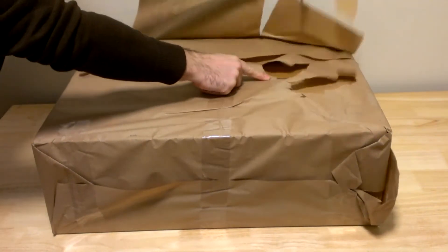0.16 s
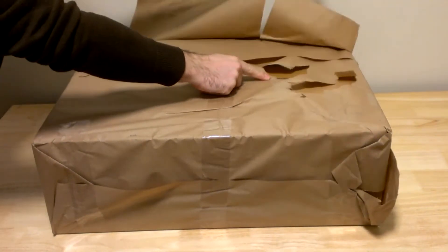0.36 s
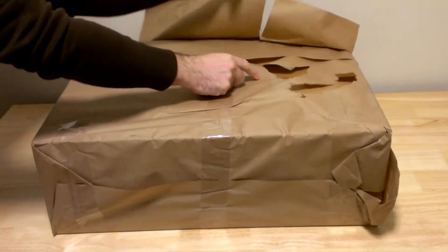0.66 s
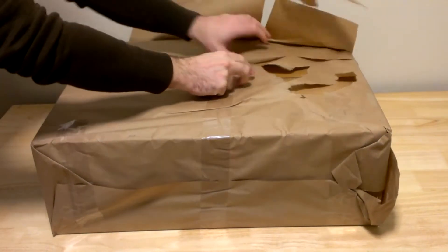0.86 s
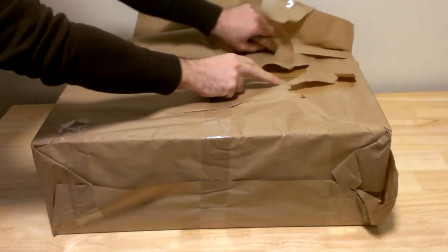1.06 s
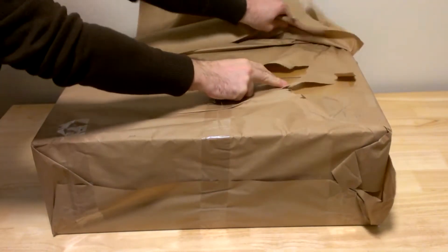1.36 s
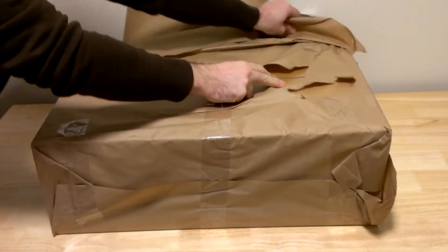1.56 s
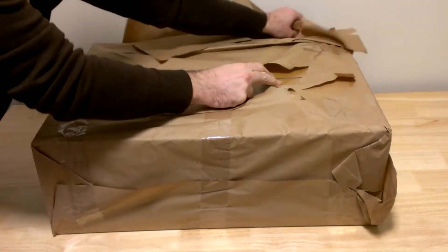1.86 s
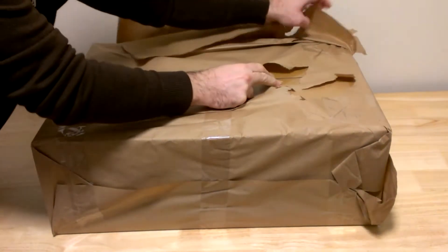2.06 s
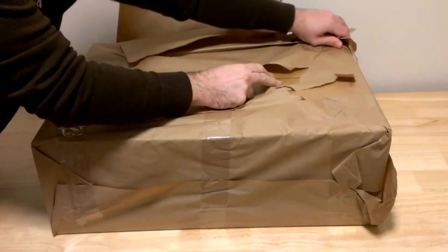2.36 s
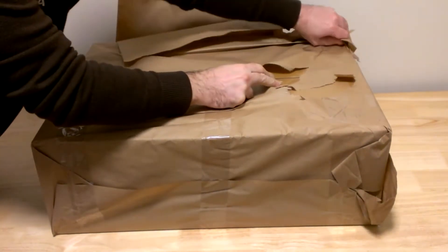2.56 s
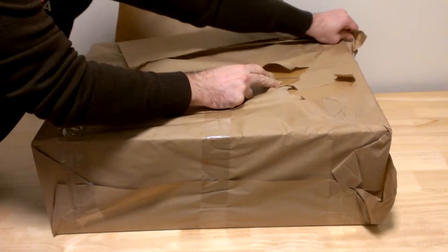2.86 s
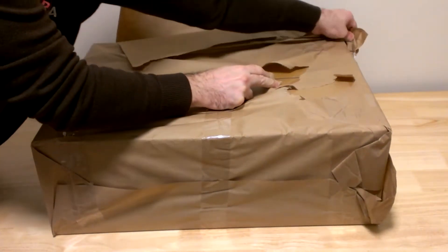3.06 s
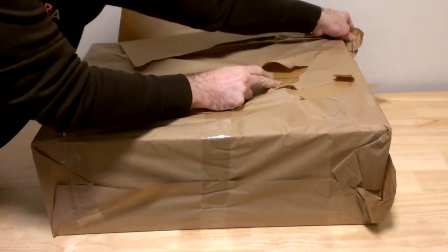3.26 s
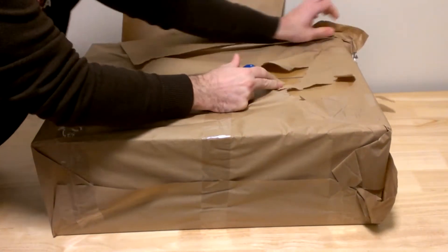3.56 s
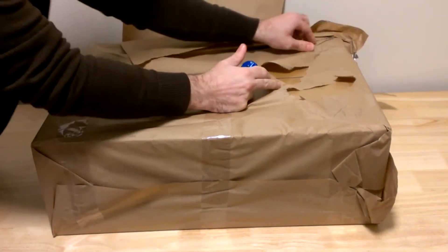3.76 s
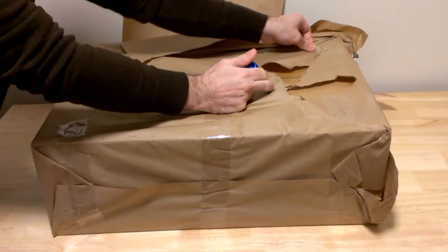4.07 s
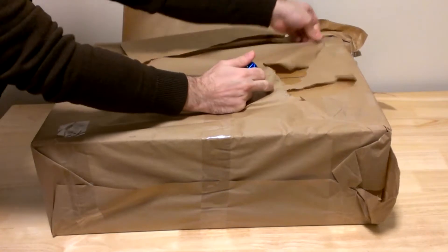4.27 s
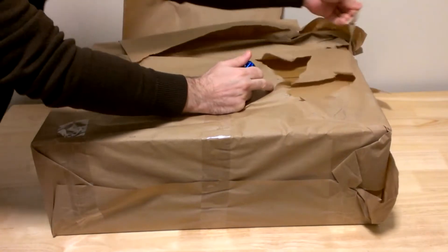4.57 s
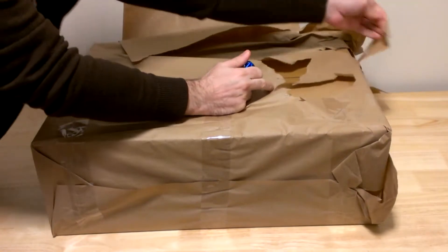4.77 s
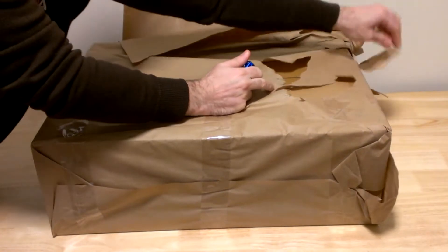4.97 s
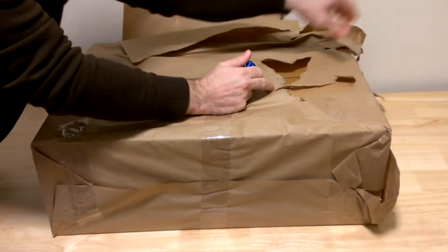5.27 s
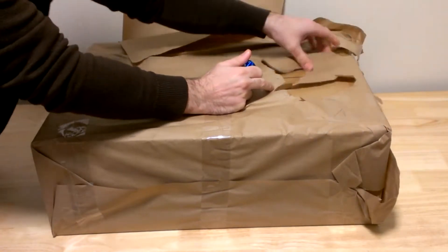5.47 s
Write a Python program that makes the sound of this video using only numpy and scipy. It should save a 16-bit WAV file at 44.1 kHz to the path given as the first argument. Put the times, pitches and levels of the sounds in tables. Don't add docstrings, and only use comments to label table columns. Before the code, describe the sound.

Close, bright, dry crinkling and ripping of heavy wrapping paper by hand, with loud snapping creases and faint hollow box thuds in a small room.

```python
import sys
import numpy as np
from scipy import signal
from scipy.fft import rfft, irfft, next_fast_len
from scipy.io import wavfile
from scipy.ndimage import uniform_filter1d

SR = 44100
rng = np.random.default_rng(int(sys.argv[2]) if len(sys.argv) > 2 else 0)


def decibels_to_gain(level_db):
    exponent = np.asarray(level_db, float) / 20
    return 10 ** exponent


def to_wav(s):
    ch = np.atleast_2d(s).T
    pcm = np.round(np.clip(ch, -1, 1) * 32767)
    wavfile.write(sys.argv[1], SR, pcm.astype(np.int16))


N = 248283
HZ = np.fft.rfftfreq(4096, 1 / SR)


def evened(x):
    return x / np.sqrt(np.mean(x ** 2) + 1e-20)


def read(points, hz):
    f, value = np.transpose(points)
    return np.interp(np.log(hz + 1), np.log(f + 1), value)


def colour(x, db, share=1):
    log_gain = np.log(decibels_to_gain(np.maximum(db, -100)))
    mirrored = np.r_[log_gain, log_gain[-2:0:-1]]
    whole = np.exp(np.conj(signal.hilbert(mirrored)))[:len(HZ)]
    phase = whole / abs(whole)
    taps = np.roll(irfft(evened(abs(whole) * share) * phase), 128)[:2048]
    return signal.oaconvolve(x, taps[None], axes=1)[:, 128:N + 128]


def ring(x, hz, t60):
    r = decibels_to_gain(-60 / (t60 * SR))
    turn = 2 * np.pi * hz / SR
    return signal.lfilter([1], [1, -2 * r * np.cos(turn), r * r], x) * np.sin(turn)


def drift(count, span):
    steps = rng.standard_normal((count, N // 64 + 2))
    steps = evened(uniform_filter1d(steps, max(round(span / 64), 1), axis=1))
    return np.array([np.interp(np.arange(N) / 64, np.arange(len(s)), s) for s in steps])


# (frequency [Hz], level per Hz [dB])
HUSH = [(120, -46), (200, 11), (489, 23), (705, 10), (1020, 25), (1850, -35), (4970, 6), (10300, 15),
        (11700, -27), (15700, -14)]


def room_tone():
    return decibels_to_gain(-64.5) * colour(rng.standard_normal((2, N)), read(HUSH, HZ))


# (frequency [Hz], reverberation time t60 [s])
ROOM = [(300, 0.23), (1500, 0.11), (5000, 0.081), (14000, 0.2)]


def room(x, count=3):
    length = SR // 3
    taps = np.zeros((count, 2, length))
    at = np.arange(80, length - 20, 20) + rng.integers(0, 20, (count, 2, (length - 81) // 20))
    np.put_along_axis(taps, at, rng.choice([-1., 1.], at.shape), 2)
    hz, t, z = signal.stft(taps, SR, nperseg=256)
    decay = decibels_to_gain(-60 * t / np.maximum(read(ROOM, hz), .02)[:, None])
    tails = signal.istft(z * decay, SR, nperseg=256)[1]
    turn = 2 * np.pi * np.arange(N) / SR / .4
    out = 0
    for k, tail in enumerate(tails):
        path = np.sqrt(2 / count) * np.cos(turn + np.pi * k / count)
        out = out + signal.oaconvolve(x * path, tail / np.linalg.norm(tail[0]), axes=1)[:, :N]
    return out


# (time [s], peak level [dB], pitch [Hz], ring t60 [s], scrape t60 [s])
FACETS = [(.701, -21.5, 1120, 0.045, 0.025), (1.114, -26, 4500, .01, .03),
          (1.2108, -17, 7900, .0008, 0.0047), (1.968, -37, 990, 0.026, 0.11),
          (2.1, -9.5, 1050, 0.054, 0.39), (2.86, -30, 1200, 0.04, 0.3), (3.553, -18, 2180, 0.06, 0.12),
          (3.575, -24, 5300, 0.055, .05), (4.128, -27, 4680, .01, .025), (4.189, -15, 3400, 0.0076, 0.25),
          (4.493, -11, 4920, 0.0069, 0.012), (4.9, -25, 660, 0.021, 2.7), (5.27, -25, 1750, .01, 0.049),
          (.1, -33, 755, 0.045, 0.82), (1, -40, 1590, .01, .04), (4.972, -27, 2750, .006, 1.3),
          (5.0, -31, 480, 0.051, 2.5), (5.624, -42, 2630, .004, .03), (.3, -4, 4870, 0.0045, 0.93),
          (3.097, -3, 4900, 0.0027, 0.79), (4.688, -11, 4860, .004, 0.32)]


def facets():
    t, out = np.arange(SR // 3) / SR, np.zeros((2, N + SR))
    noise = rng.standard_normal((len(FACETS), 2, len(t)))
    for (s, peak_db, hz, t60, scrape_t60), z in zip(FACETS, noise):
        rough = np.gradient(np.gradient(z, axis=1), axis=1)
        scrape = rough * decibels_to_gain(-60 * t / max(scrape_t60, .002))
        sound = ring(scrape, hz, max(t60, .0005))
        out[:, round(s * SR):][:, :len(t)] += decibels_to_gain(peak_db) * sound / abs(sound).max()
    return out[:, :N]


# (time [s], peak level [dB], box boom against it [dB], crackle t60 [s])
SNAPS = [(.0559, -8.5, -40, 0.049), (0.2775, -8, -34, 0.048), (.587, -14.5, -9.5, 0.18),
         (0.7, -27, -2, 0.09), (0.8156, -25.5, -11, 0.067), (0.851, -22, -4, 0.11),
         (.8787, -20.5, -5, .085), (1.0007, -26, -11, .098), (1.111, -20, -16, 0.041),
         (1.2105, -37, -28, .03), (1.2558, -16, -31, 0.28), (1.9774, -22, 2, 0.077),
         (2.0985, -10, -4, 0.29), (2.3711, -25, -8, 0.055), (2.5963, -25, -23, 0.088),
         (2.7, -27, -14, 0.089), (3.0355, -7.5, -12, 0.064), (3.0935, -5.5, -6, .022),
         (3.2152, -18.5, 4, 0.061), (3.2955, -6, -15, .18), (3.3764, -13, -29, 0.15),
         (3.5511, -8.5, -17, 0.36), (4.043, -29, -10.5, 0.2), (4.13, -37, -21, .041),
         (4.183, -14, -30, 0.055), (4.4413, -29, -6, .1), (4.4945, -19.5, -45, 0.26),
         (4.662, -9, -30, 0.14), (5.0631, -17.5, -1, 0.26), (5.27, -21, -17, 0.049)]


def snaps():
    t, (crack, deep, tone) = np.arange(SR // 6) / SR, np.zeros((3, 2, N + SR))
    noise = rng.standard_normal((len(SNAPS), 2, len(t)))
    pitch = 4500 * (1 + 0.03 * rng.standard_normal(len(SNAPS)))
    for (s, peak_db, boom_db, t60), z, hz in zip(SNAPS, noise, pitch):
        tick = decibels_to_gain(-60 * t / 0.0069)
        crackle = 0.39 * decibels_to_gain(-60 * t / max(t60, .005))
        burst = z * (tick + crackle) * decibels_to_gain(peak_db)
        at = slice(round(s * SR), round(s * SR) + len(t))
        crack[:, at] += burst
        deep[:, at] += burst * decibels_to_gain(boom_db)
        tone[:, at] += decibels_to_gain(-40) * ring(burst, hz, t60=0.04)
    drives = [deep * decibels_to_gain(-7.5), crack * decibels_to_gain(-16), crack * decibels_to_gain(-13), crack * decibels_to_gain(-8.5)]
    return [d[:, :N] for d in drives], tone[:, :N]


# (frequency [Hz], level per Hz [dB])
PAPER = [(130, -36.5), (250, -22), (420, -14), (700, -15), (1100, -10), (1700, -5), (2600, -0.5),
         (3600, 0.5), (4800, 2.5), (6000, -5), (7500, -12.5), (10000, -18), (12500, -21), (15500, -21)]
# (frequency [Hz], width [Hz], level [dB])
BOX = [(448, 45, -1), (746, 9, 6), (1050, 850, -1)]
# (frequency [Hz], width [Hz], level [dB])
PORT = (4910, 1980, 0.66)


def layers(low_hz=1050, mid_hz=3200, top_hz=7400):
    low, mid, high = (1 / (1 + (HZ / hz) ** 8) for hz in (low_hz, mid_hz, top_hz))
    rings = 1
    for hz, width, db in BOX + [PORT]:
        rings = rings + decibels_to_gain(db) / (1 + (2 * (HZ - hz) / width) ** 2)
    return read(PAPER, HZ) + 20 * np.log10(rings), (low, mid - low, high - mid, 1 - high)


def pops(pops_per_s, cycles, clump_db, patch_db, count=28):
    size = 1.0 * (rng.random((2, N)) < pops_per_s / SR)
    size *= decibels_to_gain(clump_db * drift(count=1, span=400)) * rng.choice([-1, 1], (2, N))
    kind = rng.integers(0, count, (2, N))
    patches = decibels_to_gain(patch_db * drift(count=count, span=3200))
    out = np.zeros((2, N))
    for k, hz in enumerate(np.geomspace(170, 16500, count)):
        clicks = size * (kind == k) * patches[k] ** (1 + 400 / hz)
        out += np.sqrt(hz) * evened(ring(clicks, hz, cycles / hz))
    return evened(out)


def strokes(rows, sag_db, rise_s=0, rise_share=0):
    s, length, effort_db, heft_db, fray_db = np.transpose(rows)[:, :, None]
    t, length = np.arange(N // 44 + 2) * 44 / SR - s, np.maximum(length, .005)
    rise_db = 20 * t / (rise_s + rise_share * length)
    shape_db = np.where(t < 0, rise_db, -sag_db * t / length)
    level_db = effort_db + shape_db - 550 * np.maximum(t - length, 0)
    boom_db = -18.5 + heft_db
    flap_db = -9.5 + 0.57 * heft_db - 0.033 * (effort_db + 31)
    parts_db = (boom_db, flap_db, -1.5, -11 + fray_db)
    return np.array([(decibels_to_gain(np.maximum(level_db, -150) + db) ** 2).sum(0) for db in parts_db])


# (time of full strength [s], length [s], effort [dB], heft [dB], fray [dB])
PULLS = [(.075, .19, -24.5, -6, -0.5), (.305, 0.17, -14.5, 0, 2.5), (.52, 0.16, -27, -3, 1),
         (.818, 0.11, -40, 5.5, 3), (.885, .095, -25, -1, -5.5), (1.035, 0.053, -29, 1.5, -3),
         (1.255, 0.827, -25.5, 1, 0), (2.2, 0.16, -24.5, 0.5, -1), (2.56, 0.048, -51.5, 9, 11),
         (2.712, 0.074, -36, 2, 12), (2.856, 0.35, -30, 9, 6.5), (3.095, .14, -15.5, 0.5, 2),
         (3.79, 0.14, -32, 5, 3), (4.441, 0.025, -35, -11, 2), (4.505, 0.12, -24.5, -9.5, -1),
         (4.8, .1, -31, 9.5, 7.5), (4.91, .305, -26, -3, 5), (5.55, .11, -63, 3, 5),
         (5.235, .025, -32, 1, 5), (5.31, 0.085, -32, 0.5, 10.5), (5.44, 0.041, -35, -5.5, 6.5)]
# (time [s], length [s], effort [dB], heft [dB], fray [dB])
JERKS = [(0.0, 0.074, -24.5, -4, 0), (.056, 0.029, -14, -14.5, -3), (.703, 0.073, -24.5, 3, -2.5),
         (1.114, 0.062, -21.5, -6.5, -4), (1.217, 0.036, -39, -22, 15), (2.101, 0.096, -10.5, -3, 1),
         (2.369, 0.15, -22, 5, -3), (2.632, 0.073, -43.5, 3.5, 10), (3.297, 0.24, -19, -0.5, 1),
         (3.556, 0.12, -23, -7, -5), (3.985, 0.22, -51, 4, 8), (4.05, 0.21, -40.5, -10, 4.5),
         (4.194, 0.22, -26.5, -8.5, 5), (5.273, 0.061, -27, 1, 4), (5.505, 0.069, -47.5, -8, -6),
         (.485, 0.14, -17, -2, -15), (2.507, 0.026, -42, 12, -4), (3.25, 0.062, -16, -3.5, -2),
         (3.68, 0.049, -35.5, 0, -5), (1.003, 0.064, -23, 1.5, -9), (.28, 0.044, -13.5, -11, -2),
         (4.13, .02, -49, -16, 7), (3.378, 0.1, -24, -20, -9)]
# (time of top [s], length after the top [s], effort [dB], heft [dB], fray [dB])
SQUEEZES = [(.4, 0.13, -17.5, 5, 10), (.927, 0.064, -33, -10, -6), (1.4, 0.051, -27, 1, 0),
            (1.602, 0.36, -18, 4, -1.5), (1.864, 0.095, -25.5, 6.5, 0), (1.982, 0.041, -27, 14.5, -6),
            (2.617, 0.034, -31.5, -15, 4), (2.778, 0.082, -32, -1, -7), (3.043, 0.08, -12.5, 1.5, 1),
            (3.77, 0.2, -33, 8.5, 10.5), (4.345, 0.065, -31.5, 3, 8), (4.723, 0.2, -13.5, 0, 1),
            (5.06, 0.043, -23.5, -3, -4), (5.417, 0.056, -23, -8, 6.5), (.24, 0.09, -23, -0.5, 4),
            (2.83, 0.05, -32, 6, 6.5), (2.995, 0.036, -21.5, 6.5, 5.5)]


def crumpling():
    power = strokes(PULLS, sag_db=-0.5, rise_s=0.031)
    power = power + strokes(JERKS, sag_db=13.5, rise_s=0.0044)
    power = power + strokes(SQUEEZES, sag_db=18.5, rise_share=0.68)
    swarm = pops(pops_per_s=14000, cycles=7.2, clump_db=-0.51, patch_db=1.9)
    return [swarm * np.interp(np.arange(N) / 44, np.arange(len(p)), np.sqrt(p)) for p in power]


# (frequency [Hz], coherence [0-1])
SAME = [(60, 0.34), (110, 0.51), (200, 0.92), (380, 0.95), (700, 0.9), (1290, 0.55), (2380, 0.49),
        (4400, 0.49), (8120, 0.47), (15000, 0.33)]
# (frequency [Hz], left over right [dB])
LEAN = [(60, -6), (99, -3), (160, -1), (270, 0), (450, 0.5), (740, 1), (1220, -0.5), (2010, 2), (3330, 3),
        (5500, 6), (9080, 5), (15000, 8)]


def ports(pair):
    size = next_fast_len(N)
    hz = np.fft.rfftfreq(size, 1 / SR)
    same, (a, b) = np.clip(read(SAME, hz), 0, 1), rfft(pair, size)
    right = same * a + np.sqrt(1 - same ** 2) * b
    lean_db = read(LEAN, hz)
    both = np.array([a * decibels_to_gain(lean_db / 2), right * decibels_to_gain(-lean_db / 2)])
    return irfft(both, size)[:, :N]


def scene():
    hush = room_tone()
    ringing = facets()
    creases, paper = snaps()
    paper_db, shares = layers()
    for stroke, crease, share in zip(crumpling(), creases, shares):
        paper = paper + colour(stroke + crease, paper_db, share)
    paper = decibels_to_gain(-0.5) * paper
    echoes = decibels_to_gain(-5) * room(paper)
    return ports(paper + echoes + ringing + hush)


def overloaded(x, knee=.55, roof=.82):
    over = np.maximum(abs(x) - knee, 0)
    bent = (roof - knee) * np.tanh(over / (roof - knee))
    held = np.sign(x) * (np.minimum(abs(x), knee) + bent)
    return held + 0.073 * over + .003 * x ** 2


def thinned(x, above_hz=7500, weak=0.65):
    hz, t, z = signal.stft(x, SR, nperseg=2048, noverlap=1024)
    near, wide = (uniform_filter1d(abs(z.mean(0)), size=n, axis=0) for n in (7, 60))
    dropped = (near < weak * wide) & (hz > above_hz)[:, None]
    return signal.istft(z * (1 - dropped), SR, nperseg=2048, noverlap=1024)[1][:, :N]


def roll_off(x):
    return signal.sosfilt(signal.butter(12, 16690, fs=SR, output="sos"), x)


def record(dry):
    x = signal.sosfilt(signal.butter(6, 138, "high", fs=SR, output="sos"), dry)
    edge = signal.firwin(511, 15760, window=("kaiser", 3), fs=SR)
    top = signal.oaconvolve(overloaded(x), edge[None], "same")
    return roll_off(thinned(top))


dry = scene()
out = record(dry)
to_wav(out)
```